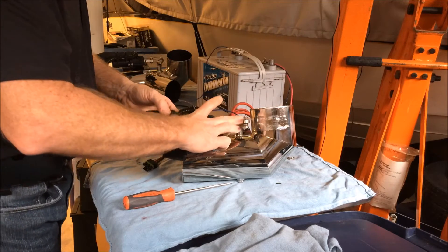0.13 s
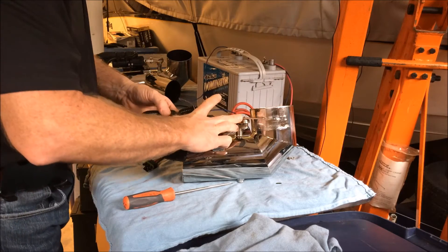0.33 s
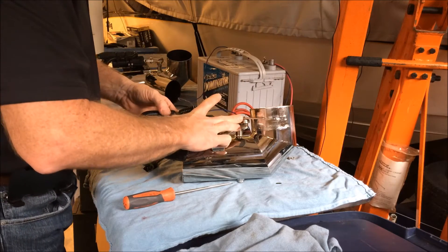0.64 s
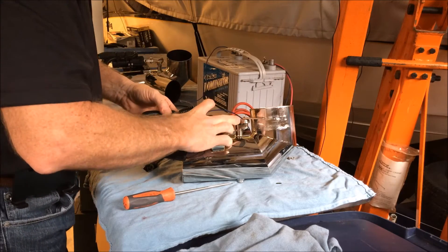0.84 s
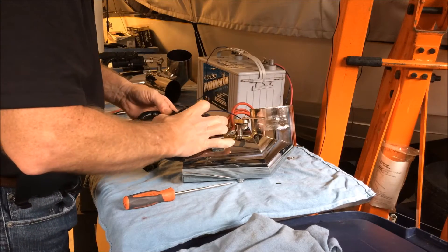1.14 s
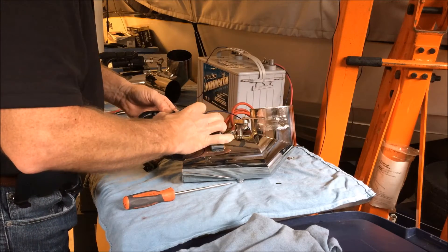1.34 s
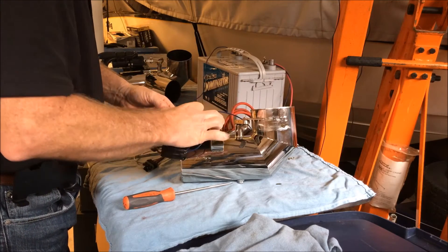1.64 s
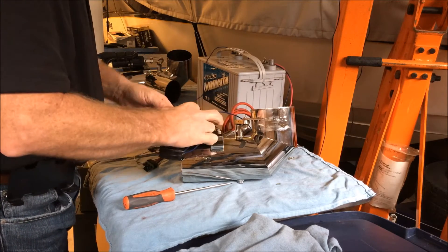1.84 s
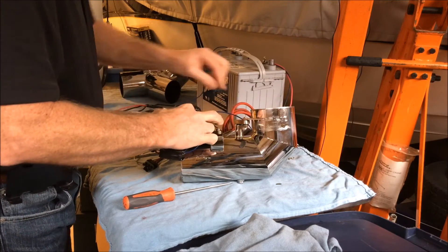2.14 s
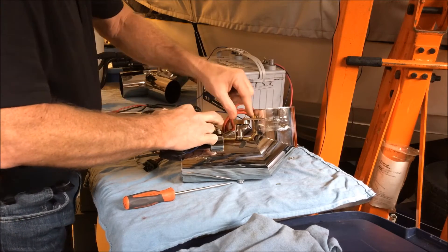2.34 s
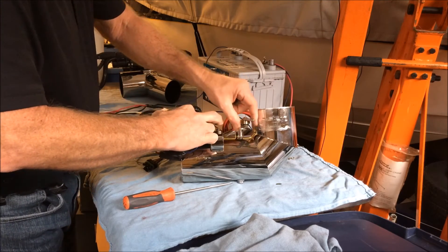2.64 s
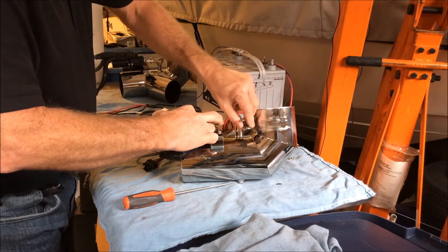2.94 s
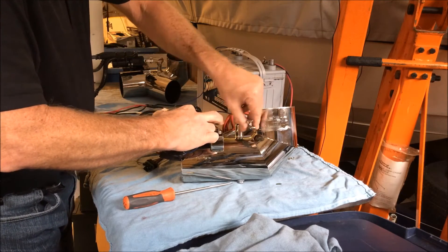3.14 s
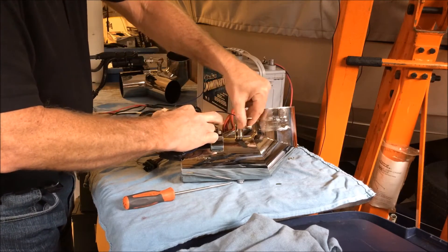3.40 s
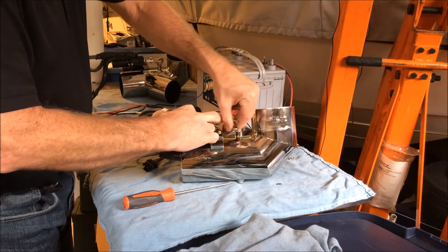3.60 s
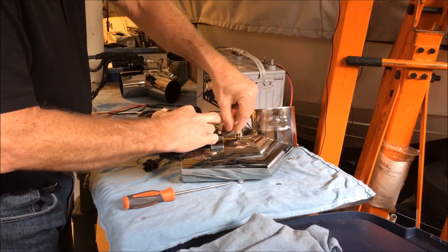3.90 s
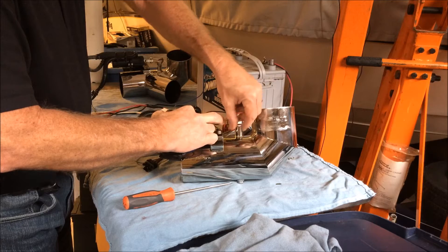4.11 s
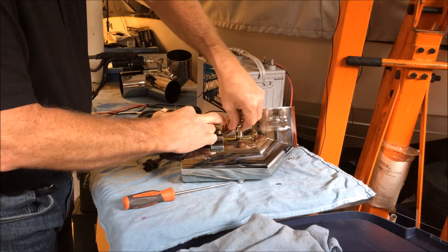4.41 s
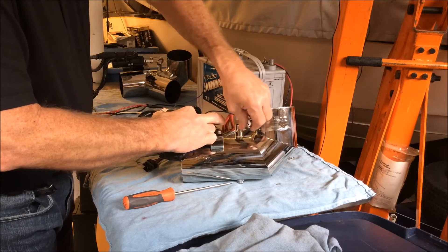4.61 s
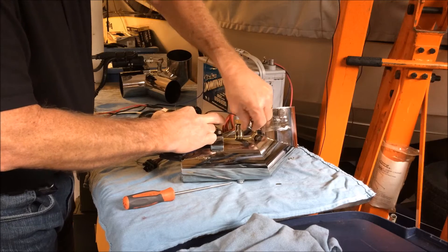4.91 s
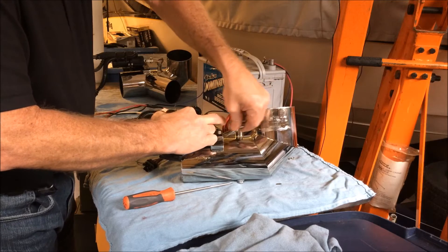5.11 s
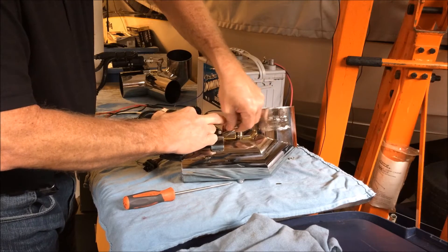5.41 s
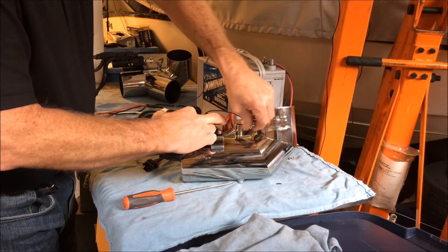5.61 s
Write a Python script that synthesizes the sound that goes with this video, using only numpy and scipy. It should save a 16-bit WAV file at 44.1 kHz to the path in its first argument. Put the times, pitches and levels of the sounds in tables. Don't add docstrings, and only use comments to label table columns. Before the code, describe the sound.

Hands work a metal spring clip: one loud ringing snap, then sparse soft knocks and tiny clicks, with constant motor hum and airy noise.

```python
import sys
import numpy as np
from scipy import signal
from scipy.fft import rfft, irfft
from scipy.io import wavfile
from scipy.ndimage import uniform_filter1d

SR = 44100
rng = np.random.default_rng(int(sys.argv[2]) if len(sys.argv) > 2 else 0)


def persist_wave(psi):
    counts = np.round(np.clip(psi, -1, 1) * 32767).astype(np.int16)
    wavfile.write(sys.argv[1], SR, np.atleast_2d(counts).T)


def level_to_linear(level):
    exponent = np.asarray(level, float) / 20
    return 10 ** exponent


N = 253575

# [t/s, peak level/dB]
SNAP = [
    (0.3541, -7),
]
# [f/Hz, level/dB per Hz]
CRACK_COLOUR = [(350, -91.5), (600, -57.5), (1310, -18.5), (3120, -23), (3730, -10.5), (4460, -16),
                (7210, -12), (12300, -9.5), (15400, -14.5), (16000, -40)]
# [f/Hz, level/dB, t60/s]
FREE_VALVE = [(1427, -36.5, 0.238), (1355, -33, 0.067), (2423, -33.3, 0.345), (2404, -39.4, 0.198),
              (3741, -28.9, 0.324), (3728, -27.9, 0.213), (2900, -46.8, 0.182), (4269, -42.1, 0.144),
              (4520, -39.2, 0.118), (4798, -39.3, 0.099), (5171, -37.3, 0.217), (5267, -24.6, 0.118),
              (5447, -26, 0.225), (5432, -38, .2), (6026, -31.5, 0.106), (7144, -22.8, 0.104),
              (7394, -19.1, 0.195), (7342, -14.5, 0.04), (8378, -30.4, 0.084), (8655, -23.9, 0.127),
              (9555, -25, 0.1), (9635, -22.5, 0.141), (10352, -30.1, 0.063), (10822, -49.6, 0.215),
              (11394, -35.9, 0.121), (12214, -20.5, 0.049), (12860, -30.6, 0.141), (13436, -42.1, 0.154),
              (14009, -42.2, 0.171), (14161, -37.0, 0.129), (14909, -33.8, 0.18)]
BEAT_DIPS = [.0122, .012, .033]

# [t/s, peak level/dB, rattle t60/s, contact/s]
KNOCKS = [
    (1.4437, -25, 0.054, 0.0043),
    (1.9007, -32.5, 0.066, 0.0095),
    (4.8222, -25.5, 0.043, 0.0061),
]
# [f/Hz, level/dB per Hz]
KNOCK_COLOURS = [
    [(450, -30), (850, -1), (1360, -7), (1710, -8), (2550, -8), (2840, -18), (3830, -11), (4100, -17),
     (6090, -36), (7680, -15), (9040, -37), (11100, -24), (15600, -47)],
    [(410, -29), (700, -4), (1320, -1), (2000, -13), (2500, 0), (3200, -13), (3840, -5.5), (6040, -29),
     (7160, -17), (10000, -30), (15600, -34)],
    [(240, -32), (400, -6), (511, -3), (901, -13.5), (1470, -3.5), (1910, -12), (3170, -12), (3470, -10.5),
     (5330, -13), (5670, -14), (8320, -14), (15600, -30)],
]
# [f/Hz, level/dB, t60/s]
PINCHED = [(514, -46, .3), (780, -41, .15), (965, -41, .12), (1345, -43, .23), (1808, -50, .28),
           (2267, -41, .11), (2514, -26, .05), (3077, -39, .05), (3723, -43, .12), (4133, -56, .3),
           (4269, -54, .23), (4755, -46, .05), (7461, -40, .05), (7855, -46, .05)]
CUPPED = [(824, -45, .09), (1030, -44, .16), (1340, -47, .1), (2273, -52, .21), (2421, -49, .21),
          (2785, -42, .05), (3441, -51, .13), (3745, -45, .15), (3912, -45, .06), (4270, -52, .15)]
PRESSED = [(465, -36, .1), (710, -39, .08), (1324, -44, .11), (1481, -36, .05), (1766, -37, .05),
           (2316, -43, .09), (3092, -31, .05), (4272, -48, .15), (4872, -38, .05), (5285, -39, .11),
           (6700, -37, .05), (8031, -42, .1), (8285, -44, .14), (9552, -47, .11)]
# (t/s, [f/Hz, level/dB, t60/s])
LINGER = (1.4438, [(3742, -54, .5), (4290, -60, .3)])

# [f/Hz, width/Hz]
CLIP_MODES = [(3130, 240), (6150, 1500), (14800, 1700)]
# [f/Hz, level/dB]
TICK_COLOUR = [(900, -32.5), (2200, -0.5), (5000, -2), (8000, -5.5), (11000, -7), (15600, -9)]
BOW_DB = (28, 4, 8)
TIP_DB = (3, 11, 19)
LEG_DB = (1, 21, 8)
PAD_DB = (3, 9, -22)
SEAT_DB = (6, 4, 5)
BOW = [(2.891, -45.5, 0.076), (3.299, -50.5, 0.11), (3.322, -47, 0.066), (4.022, -47.5, 0.026),
       (4.087, -47, .03), (4.358, -47, .066)]
TIP = [
    (.302, -37, 0.24),
    (2.888, -37.5, .024),
    (4.348, -53.5, .027),
    (4.3554, -41.5, .025),
]
LEG = [(2.921, -41, .03), (3.325, -54, 0.018), (3.317, -50, .06), (4.402, -45, .02), (4.418, -38, 0.015),
       (4.428, -59, .05)]
PAD = [
    (3.049, -41.5, 0.026),
    (3.052, -57, .089),
    (3.336, -47, 0.041),
    (4.425, -52, .02),
]
SEAT = [(.294, -38, 0.026), (.3235, -46.5, .019), (2.504, -53, 0.013), (2.920, -39, 0.037),
        (2.93, -41.5, 0.09), (3.327, -56, .02), (3.394, -51, .03)]
# [t/s, half length/s, level/dB]
RUBS = [
    (.315, .022, -66),
    (2.6, .12, -75),
    (3.32, .025, -66),
    (5.21, .07, -72),
]

# [f/Hz, t60/s]
SHOP_DECAY = [(500, 0.34), (2000, 0.19), (4000, 0.21), (8000, 0.16), (15000, 0.16)]
SHAFT_ORDERS = (1, 3, 4, 5, 7, 40, 43, 44, 45, 51, 57)
MAINS_ORDERS = (1, 10, 12, 19, 24, 36, 66, 108)
# [level/dB, left minus right/dB, left lead/rad]
HUM_LINES = [(-56.5, -3.5, -0.4), (-51.5, -1.6, .32), (-58.5, -4, .56), (-58.5, -3, 0.57), (-53, 6.5, 0.43),
             (-77.5, -4, .7), (-77, -1.5, .7), (-89.5, 1.6, 0.68), (-72, -1, 1), (-86.5, -1.5, 0.76),
             (-77.5, -2, 0.8), (-56.5, 4, 0.46), (-69.5, -9, 0.46), (-67.5, -8.5, .6), (-75.5, -1.7, .7),
             (-81, 0, 0.64), (-81, 6.5, 0.94), (-94.5, -0.3, 0.69), (-90, 2.5, 0.69)]

# [f/Hz, level/dB per Hz]
AIR_COLOUR = [(12, -34), (20, -8), (49, -8), (81, -8.5), (133, -9.5), (267, -12.5), (324, -10.5),
              (373, -10.5), (566, -8.5), (770, -19), (1170, -18), (1630, -21), (1830, -22.5), (3460, -32.5),
              (15600, -42.5)]
# [f/Hz, width/Hz, level/dB]
DUCT = [(25, 20, 5.5), (71, 19, -4), (250, 39, 3.5), (568, 56, 4.5), (1030, 470, 5), (1810, 120, 7.5),
        (2617, 120, 2), (4880, 270, 3.5), (15500, 1500, 3.5)]
# [f/Hz, correlation]
AIR_LIKENESS = [(60, .88), (140, .95), (420, .8), (560, .97), (700, .85), (860, .25), (980, .9), (1500, .8),
                (2100, .78), (2500, .45), (3400, .1), (4400, .4), (7000, .25), (15000, .1)]
# [f/Hz, left minus right/dB]
AIR_LEAN = [(60, 2.5), (110, 1), (200, -0.5), (380, 0.5), (700, -0.5), (1290, 3), (2380, 1), (4400, -1.5),
            (8120, 0.5), (15000, 0.5)]
# [f/Hz, left lead/rad]
AIR_LEAD = [(60, 0), (250, .45), (500, .15), (1000, .2), (1300, .85), (1680, 1.45), (1950, .6), (2300, 1.1),
            (2800, 1.4), (4300, 4.5), (6000, 6.0)]

BURST_HZ = np.fft.rfftfreq(8192, 1 / SR)


def evened(x):
    return x / np.sqrt(np.mean(x ** 2) + 1e-20)


def peaked(x):
    return x / (abs(x).max() + 1e-20)


def read(points, hz):
    f, value = np.transpose(points)
    return np.interp(np.log(hz + 1), np.log(f + 1), value)


def bumps(peaks, hz):
    return sum(db / (1 + (2 * (hz - f) / width) ** 2) for f, width, db in peaks)


def add(mix, s, sound):
    part = mix[round(s * SR):][:len(sound)]
    part += sound[:len(part)]


def ring(modes, rise, phases):
    t = np.arange(SR // 2) / SR
    hz, db, t60 = np.transpose(modes)[:, :, None]
    sines = np.sin(2 * np.pi * hz * t + phases[:, None])
    return (level_to_linear(db - 60 * t / t60) * sines).sum(0) * (1 - np.exp(-t / rise))


def burst(colour_db, t60, rise, rough_db, hold=0):
    t = np.arange(8192) / SR
    noise = irfft(rfft(rng.standard_normal(len(t))) * level_to_linear(colour_db))
    lumps = evened(uniform_filter1d(rng.standard_normal(len(t)), 60))
    fall_db = -60 * np.maximum(t - hold, 0) / t60
    return peaked(noise * level_to_linear(rough_db * lumps + fall_db) * (1 - np.exp(-t / rise)))


def snap():
    rings, crack = np.zeros(N), np.zeros(N)
    s, db = SNAP[0]
    hz = np.transpose(FREE_VALVE)[0]
    phases = rng.uniform(0, 2 * np.pi, len(FREE_VALVE))
    beat_hz = hz[0:6:2] - hz[1:6:2]
    phases[1:6:2] = phases[0:6:2] + 2 * np.pi * beat_hz * BEAT_DIPS - np.pi
    free = ring(FREE_VALVE, .0006, phases)
    grip_s = .12
    gripped = np.maximum(np.arange(len(free)) / SR - grip_s, 0)
    add(rings, s, free * level_to_linear(-180 * gripped))
    colour_db = read(CRACK_COLOUR, BURST_HZ)
    add(crack, s, level_to_linear(db - 6.5) * burst(colour_db, 0.077, 0.00026, 3.0))
    add(crack, s, level_to_linear(db - 5.5) * burst(colour_db, 0.017, .00015, 1.2))
    return rings, crack


def knocks():
    rings, rattle = np.zeros(N), np.zeros(N)
    grips = [PINCHED, CUPPED, PRESSED]
    for (s, db, t60, hold), colour, modes in zip(KNOCKS, KNOCK_COLOURS, grips):
        add(rattle, s, level_to_linear(db) * burst(read(colour, BURST_HZ), t60, 0.00097, 1.5, hold))
        phases = rng.uniform(0, 2 * np.pi, len(modes))
        add(rings, s, level_to_linear(-1.5) * ring(modes, .0015, phases))
    add(rings, LINGER[0], ring(LINGER[1], .002, np.zeros(2)))
    return rings, rattle


def ticks():
    out = np.zeros(N)
    parts = [(BOW, BOW_DB), (TIP, TIP_DB), (LEG, LEG_DB), (PAD, PAD_DB), (SEAT, SEAT_DB)]
    for slips, levels_db in parts:
        peaks = [(*mode, level) for mode, level in zip(CLIP_MODES, levels_db)]
        colour_db = read(TICK_COLOUR, BURST_HZ) + bumps(peaks, BURST_HZ)
        for s, db, t60 in slips:
            add(out, s, level_to_linear(db) * burst(colour_db, t60, 0.00045, 4.2))
    return out


def rubs():
    band = signal.butter(2, [2500, 9000], "band", fs=SR, output="sos")
    hiss = evened(signal.sosfilt(band, rng.standard_normal(N)))
    t = np.arange(N) / SR
    return hiss * sum(level_to_linear(db) * np.exp(-((t - s) / half) ** 2) for s, half, db in RUBS)


def shop(x):
    taps = np.zeros((2, SR // 2))
    at = np.arange(120, SR // 2 - 20, 20)
    at = at + rng.integers(0, 20, (2, len(at)))
    np.put_along_axis(taps, at, rng.choice([-1., 1.], at.shape), 1)
    hz, t, z = signal.stft(taps, SR, nperseg=128)
    z = z * level_to_linear(-60 * t / read(SHOP_DECAY, hz)[:, None])
    tail = signal.istft(z, SR, nperseg=128)[1][:, :SR // 4]
    return signal.fftconvolve(x, tail / np.linalg.norm(tail[0]), axes=1)[:, :N]


def drift(rate):
    t = np.arange(N // 64 + 2) * 64 / SR
    rates = np.geomspace(rate / 20, rate, 20)
    slow = sum(np.sin(2 * np.pi * (f * t + rng.random())) / np.sqrt(f) for f in rates)
    return np.repeat(evened(slow), 64)[:N]


def tone(turns, db, lean_db, lead):
    side = np.array([[.5], [-.5]])
    level = np.sqrt(2) * level_to_linear(db + side * lean_db + 0.22 * drift(2.5))
    return level * np.sin(2 * np.pi * (turns + rng.random()) + side * lead)


def hum():
    shaft_hz, mains_hz = 45.67, 120.0
    shaft = np.cumsum(shaft_hz * (1 + drift(1) / 5000)) / SR
    mains = mains_hz * np.arange(N) / SR
    turns = [k * shaft for k in SHAFT_ORDERS] + [k * mains for k in MAINS_ORDERS]
    return sum(tone(turn, *row) for turn, row in zip(turns, HUM_LINES))


def air():
    frames, hz = N // 512 + 5, np.fft.rfftfreq(2048, 1 / SR)
    a, b, c, d, patches = rng.standard_normal((frames, 1025, 5)).T
    patches = evened(uniform_filter1d(uniform_filter1d(patches, 20, 0), 8, 1))
    colour_db = read(AIR_COLOUR, hz) + bumps(DUCT, hz)
    same = np.clip(read(AIR_LIKENESS, hz), -1, 1)[:, None]
    left = a + 1j * b
    right = same * left + np.sqrt(1 - same ** 2) * (c + 1j * d)
    tilt = (level_to_linear(read(AIR_LEAN, hz) / 2) * np.exp(.5j * read(AIR_LEAD, hz)))[:, None]
    z = np.array([left * tilt, right / tilt]) * level_to_linear(colour_db[:, None] + 0.77 * patches)
    noise = signal.istft(z, nperseg=2048, noverlap=1536)[1][:, :N]
    return level_to_linear(-46.5) * evened(noise)


def scene():
    rings, crack = snap()
    thuds, rattle = knocks()
    faint = ticks() + rubs()
    bench = rings + crack + thuds + rattle + faint
    to_shared = level_to_linear(-4) * (crack + rattle) + level_to_linear(-7) * faint
    shared, apart = shop(np.array([to_shared, level_to_linear(-26) * bench]))
    return bench + shared + apart * np.array([[1], [-1]]) + hum() + air()


def roll_off(x):
    return signal.sosfilt(signal.butter(12, 16430, fs=SR, output="sos"), x)


def record(dry):
    lowpass = signal.firwin(511, 15820, window=("kaiser", 8), fs=SR)
    limited = signal.oaconvolve(dry, lowpass[None], "same")
    return roll_off(limited)


dry = scene()
out = record(dry)
persist_wave(out)
```